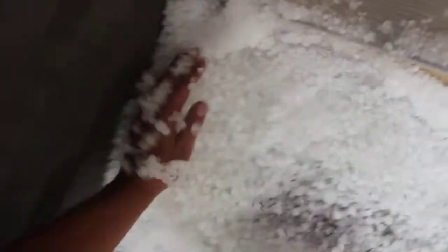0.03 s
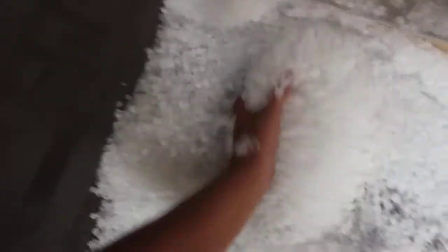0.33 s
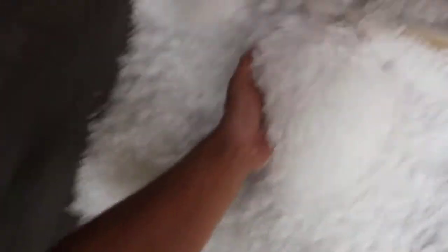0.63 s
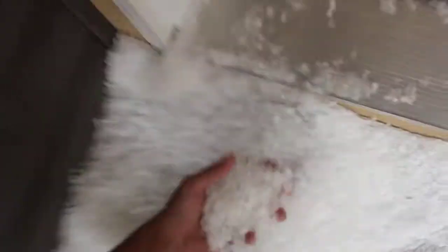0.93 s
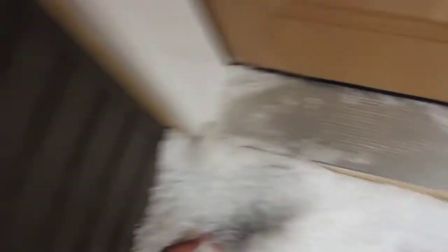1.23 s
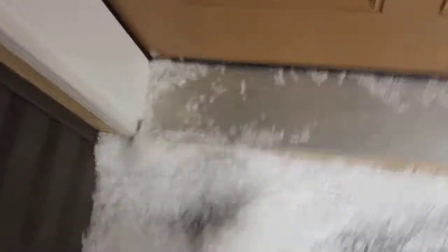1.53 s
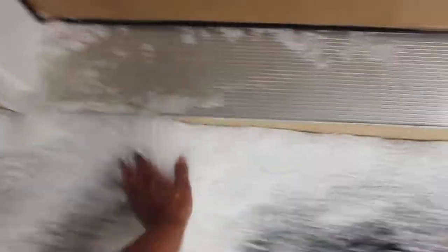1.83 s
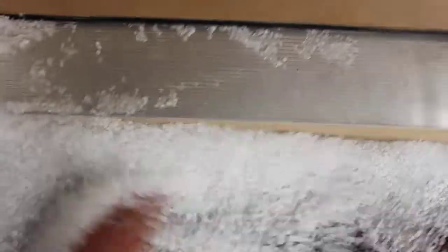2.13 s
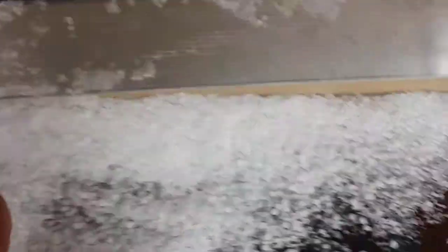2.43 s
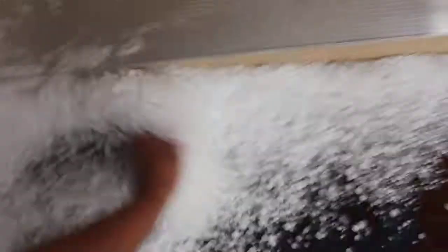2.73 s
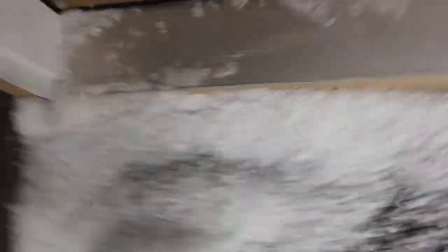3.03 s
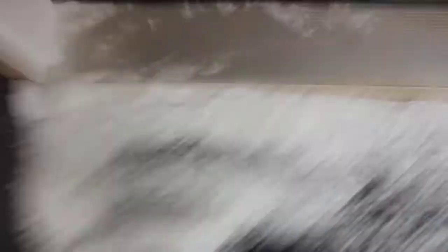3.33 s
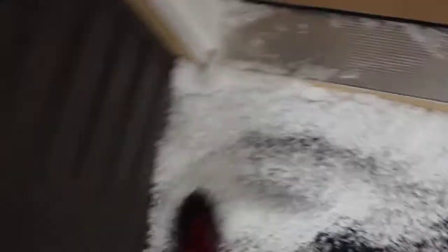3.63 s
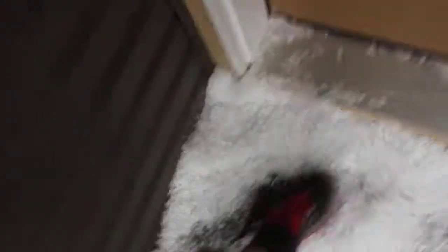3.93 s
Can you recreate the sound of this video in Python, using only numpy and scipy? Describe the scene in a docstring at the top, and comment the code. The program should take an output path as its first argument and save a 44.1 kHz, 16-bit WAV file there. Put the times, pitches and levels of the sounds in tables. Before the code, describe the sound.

A hand rakes through loose hailstones outdoors, making dense, bright ticking and deeper crunches. The raking eases, resumes in several scoops, pauses, then returns once more. Low wind buffeting and handling knocks hit the nearby microphone almost throughout.

```python
"""Hand raking hailstones on a doorstep

Countless ice pellets tick together close to a phone; each scoop shoves a mass of them
with a deeper crunch, and some rattle on the metal sill.
Gusts and handling buffet the microphone with low, ragged bumps."""
import sys
import numpy as np
from scipy import signal
from scipy.fft import rfft, irfft
from scipy.io import wavfile
from scipy.ndimage import uniform_filter1d

SR = 44100
rng = np.random.default_rng(int(sys.argv[2]) if len(sys.argv) > 2 else 0)


def to_wav(sig):
    """Store sig (one row per channel, or 1-D mono) as 16-bit WAV at the path in sys.argv[1].

    Samples outside -1..1 are clipped; the rate is SR.
    """
    pcm = np.clip(np.atleast_2d(sig), -1, 1) * 32767
    pcm = np.round(pcm).astype(np.int16)
    wavfile.write(sys.argv[1], SR, pcm.T)  # frames by channels


N = 176400
CRUNCHES_PER_S, CRUNCH_SPREAD_DB = 7000, 0.5


def undb(db):
    """Decibels to gain."""
    return 10 ** (np.asarray(db) / 20)


def unit(x):
    """Scale to rms 1."""
    return x / np.sqrt(np.mean(x ** 2))


def clock():
    """Sample times [s]."""
    return np.arange(N) / SR


def cut(x, hz, kind, order=2):
    """Butterworth low-pass or high-pass."""
    return signal.sosfilt(signal.butter(order, hz, kind, fs=SR, output="sos"), x)


def colour(x, points):
    """Filter by (frequency [Hz], gain [dB]) points."""
    hz, db = np.array(points).T
    bins_hz = np.maximum(np.arange(N // 2 + 1) * SR / N, 1)
    gain = undb(np.interp(np.log(bins_hz), np.log(hz), db))
    return irfft(rfft(x) * gain, N)


def flutter(rms_db, rate_hz):
    """Smooth random gain."""
    hold = int(SR / rate_hz)
    steps = np.repeat(rng.standard_normal(N)[:N // hold + 1], hold)
    return undb(rms_db * unit(uniform_filter1d(steps, hold)[:N]))


def impacts(per_s, spread_db):
    """Random impulses: many small, a few large."""
    hits = rng.random(N) < per_s / SR
    polarity = np.sign(rng.standard_normal(N))
    size = np.minimum(rng.exponential(size=N), 3.6)
    return hits * polarity * undb(spread_db * size)


def swell(peak_s, rise_s, fall_s):
    """Asymmetric bell envelope."""
    t = clock() - peak_s
    return np.exp(-(t / np.where(t < 0, rise_s, fall_s)) ** 2 / 2)


def loose_pellets():
    """Ice slides over ice in dense, bright ticks."""
    # slide envelope (time [s], level [dB])
    slide = [(0, -30), (0.025, -28.5), (0.09, -35.5), (0.2, -32.5), (0.3, -33.5), (0.35, -35),
             (0.54, -40.5), (0.61, -35), (0.68, -49.5), (0.76, -45.5), (0.86, -42), (1.0, -45),
             (1.15, -50.5), (1.22, -51.5), (1.33, -59), (1.405, -55), (1.425, -36.5), (1.45, -37),
             (1.51, -39.5), (1.69, -32.5), (1.8, -36), (1.93, -37.5), (2.05, -33), (2.19, -28.5),
             (2.26, -32.5), (2.3, -36), (2.38, -48.5), (2.55, -35), (2.74, -33.5), (2.79, -40),
             (2.935, -36.5), (2.99, -48), (3.13, -55.5), (3.25, -70), (3.34, -60.5), (3.41, -42.5),
             (3.46, -63), (3.535, -72), (3.555, -38.5), (3.7, -40.5), (3.94, -42), (4.0, -50)]
    # tick spectrum (frequency [Hz], gain [dB])
    spectrum = [(500, -9.5), (1200, -6), (2000, -9), (3000, -5.5), (5000, -2.5), (7700, -2), (12300, -0.5),
                (15500, -4.5)]
    ticks = cut(colour(impacts(per_s=11000, spread_db=1), spectrum), 290, "high")
    time_s, level_db = np.array(slide).T
    envelope = undb(np.interp(clock(), time_s, level_db) + 2)
    return unit(ticks) * envelope * flutter(rms_db=0.96, rate_hz=90)


def gust(start_s, end_s, attack_s=0.0045, release_s=0.0058, tail_db=-10, tail_s=0.076):
    """Gust envelope: quick attack, hold, quick release, weak tail."""
    t = clock()
    attack = (1 + np.tanh((t - start_s) / attack_s)) / 2
    release = (1 - np.tanh((t - end_s) / release_s)) / 2
    tail = undb(tail_db) * np.exp(-np.maximum(t - end_s, 0) / tail_s)
    return attack * np.maximum(release, tail)


def wind():
    """Ragged gusts over a low breeze: large eddies thud, small ones rasp."""
    # gusts on the microphone (start [s], end [s], rumble level [dB], rasp level [dB])
    gusts = [(0, 0.089, -26.5, -32.5), (0.1, 0.177, -22.5, -40.5), (0.214, 0.585, -45.5, -48),
             (0.41, 0.463, -37.5, -52), (0.567, 0.623, -22.5, -39), (0.618, 0.68, -20.5, -31),
             (0.69, 0.732, -27, -31), (0.721, 0.8, -29, -44.5), (0.817, 0.844, -29, -45),
             (0.882, 0.916, -30.5, -41), (0.962, 1.035, -31.5, -40.5), (1.076, 1.146, -29.5, -39),
             (1.205, 1.258, -25, -41), (1.237, 1.289, -23.5, -33), (1.26, 1.333, -26.5, -44),
             (1.343, 1.431, -23, -39), (1.442, 1.496, -33.5, -44), (1.516, 1.545, -22, -32),
             (1.566, 1.642, -24, -33), (1.677, 1.751, -25.5, -32), (1.78, 1.872, -33.5, -41.5),
             (2.037, 2.086, -29, -44), (2.173, 2.247, -30, -43), (2.248, 2.323, -21.5, -28.5),
             (2.334, 2.415, -28, -32.5), (2.438, 2.493, -26.5, -26), (2.486, 2.565, -31.5, -31.5),
             (2.538, 2.6, -24, -26.5), (2.59, 2.731, -31.5, -46), (2.785, 2.896, -26.5, -43.5),
             (2.924, 2.978, -25, -35), (2.972, 3.134, -27, -39.5), (3.139, 3.19, -20, -33),
             (3.184, 3.349, -24, -33.5), (3.377, 3.414, -33.5, -46), (3.532, 3.617, -36.5, -57),
             (3.835, 3.885, -45, -75), (3.972, 3.994, -37, -67)]
    # large-eddy spectrum (frequency [Hz], gain [dB])
    rumble_spectrum = [(13, -40), (22, -17.5), (108, 0.5), (172, 1), (354, -5.5), (700, -21.5), (910, -44),
                       (1540, -120)]
    # small-eddy spectrum (frequency [Hz], gain [dB])
    rasp_spectrum = [(250, -43), (480, 4.5), (800, -3.5), (1300, -11.5), (2200, -22.5), (4000, -31.5),
                     (8000, -46)]
    rumble_gain, rasp_gain = 0, 0
    for start_s, end_s, rumble_db, rasp_db in gusts:
        envelope = gust(start_s, end_s)
        rumble_gain = np.maximum(rumble_gain, undb(rumble_db) * envelope)
        rasp_gain = np.maximum(rasp_gain, undb(rasp_db) * envelope ** 2)
    rumble = cut(colour(impacts(per_s=900, spread_db=3), rumble_spectrum), 513, "low", order=4)
    rasp = cut(colour(impacts(per_s=700, spread_db=4), rasp_spectrum), 164, "high")
    bursts = undb(2) * unit(rumble) * rumble_gain + undb(1) * unit(rasp) * rasp_gain
    breeze = undb(-52.5) * unit(cut(rumble, 216, "low")) * flutter(rms_db=1.5, rate_hz=25)
    return bursts * flutter(rms_db=2, rate_hz=110.1) + breeze


def air():
    """Faint, steady outdoor noise."""
    # (frequency [Hz], gain [dB])
    spectrum = [(30, -16), (150, 8), (500, -4.5), (1600, -1.5), (4000, -16.5), (15000, -37)]
    return undb(-55.5) * unit(colour(rng.standard_normal(N), spectrum))


def buffets(rise_cycles=0.31, fall_cycles=0.41, crack_s=0.0028):
    """Pointed pressure swings of a cycle or two, each with a dull crack."""
    # bumps on the microphone (time [s], thud level [dB], pitch [Hz], crack level [dB])
    bumps = [(0.001, -2.5, 284, -26.5), (0.168, -9.5, 236, -49), (0.58, -6.5, 269, -34),
             (0.622, -1.5, 324, -40), (0.642, -2, 324, -24.5), (0.654, -9, 380, -26),
             (0.66, -3.5, 412, -49), (0.695, -17, 350, -29), (0.712, -3.5, 178, -29), (0.718, -4, 417, -25),
             (0.756, -12, 368, -34.5), (0.77, -15, 303, -48), (0.98, -15, 348, -39.5),
             (1.009, -14.5, 320, -38), (1.104, -9.5, 264, -43), (1.243, -4.5, 343, -42),
             (1.252, -6.5, 520, -27.5), (1.417, -7, 217, -57), (1.544, -12, 313, -31),
             (1.573, -15, 445, -39), (1.6, -5.5, 377, -54), (1.676, -14, 384, -30), (1.723, -6.5, 360, -32),
             (1.746, -6, 308, -31), (1.821, -15, 364, -33.5), (2.257, -8, 400, -38), (2.318, -7, 296, -33),
             (2.349, -4.5, 386, -28), (2.401, -8, 238, -52), (2.432, -6.5, 340, -27),
             (2.561, -5.5, 295, -41), (2.567, -8.5, 407, -24), (2.827, -11, 500, -25),
             (2.914, -4.5, 245, -28), (2.951, -5, 340, -32), (2.953, 1, 317, -29.0),
             (3.029, -13, 315, -30.5), (3.099, -16.5, 219, -55), (3.162, -4, 266, -26),
             (3.277, -15, 384, -31), (3.315, -13, 251, -50), (3.327, -8.5, 330, -40),
             (3.392, -3, 240, -26.5), (3.552, -15.5, 473, -35.5)]
    thuds, crack_gain = 0, 0
    for (time_s, thud_db, hz, crack_db), phase in zip(bumps, rng.random(len(bumps))):
        t = clock() - time_s
        thud_tau_s = np.where(t < 0, rise_cycles, fall_cycles) / hz
        thud_envelope = np.exp(-np.minimum(np.abs(t) / thud_tau_s, 20))
        thuds += undb(thud_db) * thud_envelope * np.cos(2 * np.pi * (hz * t + phase))
        crack_tau_s = np.where(t < 0, crack_s / 2, crack_s)
        crack_gain += undb(crack_db) * np.exp(-np.minimum(np.abs(t) / crack_tau_s, 20))
    grit = cut(cut(rng.standard_normal(N), 590, "high"), 1434, "low", order=3)
    return undb(1) * cut(thuds, 2300, "low") + undb(4) * crack_gain * unit(grit)


def scoops():
    """Each shove moves a mass of pellets; the deeper it digs, the lower the crunch reaches."""
    # shoves (peak [s], rise [s], fall [s], level [dB], low edge [Hz], high edge [Hz])
    shoves = [ (.016, .05, 0.032, -27.5, 970, 6200), (.295, 0.058, 0.045, -30.5, 2260, 6200),
              (.32, 0.21, 0.17, -37.5, 567, 3400), (1.15, 0.18, 0.27, -51.5, 670, 3200),
              (1.448, 0.0087, 0.056, -37, 1110, 5270), (1.69, 0.067, 0.042, -33, 2600, 8050),
              (2.171, 0.065, 0.035, -31, 1710, 8240), (2.292, 0.01, 0.029, -29, 1220, 6060),
              (2.58, 0.088, .06, -41, 1340, 5030), (2.691, 0.078, 0.057, -32.5, 1390, 5270),
              (3.555, 0.0017, 0.17, -40.5, 1100, 11000), (3.694, 0.065, 0.063, -32, 1330, 4430), ]
    out = 0
    for peak_s, rise_s, fall_s, db, low_hz, high_hz in shoves:
        hits = impacts(CRUNCHES_PER_S, CRUNCH_SPREAD_DB)
        crunch = cut(cut(hits, low_hz, "high", order=4), high_hz, "low")
        out += unit(crunch) * undb(db) * swell(peak_s, rise_s, fall_s)
    return out * flutter(rms_db=1.5, rate_hz=70)


def spill(decay_s=0.0015):
    """Stray pellets trickle off the lifted handful, one tiny snap each."""
    snap = rng.standard_normal(300) * np.exp(-clock()[:300] / decay_s)
    drops = impacts(per_s=450, spread_db=7.5)
    ticks = cut(signal.fftconvolve(drops, snap)[:N], 2000, "high")
    return undb(-50) * unit(ticks) * swell(peak_s=1.76, rise_s=2.5, fall_s=0.1)


def sill(t60_s=0.12):
    """Thrown pellets ring the metal sill."""
    # sill modes (frequency [Hz], level [dB])
    modes = [(2333, -6), (2561, -10), (2731, 2), (2785, 2), (2848, -8), (2918, -7), (3063, 3), (3365, -15),
             (4634, -6)]
    # pellet showers (peak [s], rise [s], fall [s], level [dB])
    showers = [(.29, 0.018, 0.03, -30), (.3, 0.22, 0.2, -53)]
    t = clock()[:SR // 2]
    ring = sum(undb(db) * np.sin(2 * np.pi * hz * t) for hz, db in modes)
    ring *= np.exp(-np.log(1000) * t / t60_s)
    envelope = sum(undb(db) * swell(*timing_s) for *timing_s, db in showers)
    hits = unit(impacts(per_s=1200, spread_db=2.5)) * envelope
    return signal.fftconvolve(hits, ring / np.linalg.norm(ring))[:N]


def clicks(decay_s=0.0013):
    """Single pellets snap close to the microphone."""
    # snaps (time [s], level [dB])
    snaps = [(0.895, -28), (.980, -29), (1.094, -26), (1.128, -25.5), (1.142, -27), (1.295, -36),
             (1.368, -26), (1.392, -35), (1.82, -15), (3.163, -26.5), (3.205, -26), (3.225, -35)]
    t = clock()
    envelope = sum(undb(db) * (t >= at_s) * np.exp(-np.abs(t - at_s) / decay_s) for at_s, db in snaps)
    noise = cut(rng.standard_normal(N), 1600, "high", order=1)
    return undb(-5.5) * envelope * unit(noise)


def hollows(bandwidth_hz=590, octaves_per_s=2.6):
    """The crunch rings the hollow under the cupped hand; pitch climbs as pellets fill it."""
    # hollow resonances (peak [s], rise [s], fall [s], level [dB], pitch at peak [Hz])
    resonances = [(2.67, 0.054, 0.033, -41.5, 2530), (3.685, 0.062, 0.073, -36, 1120)]
    out = 0
    for peak_s, rise_s, fall_s, db, hz in resonances:
        pitch_hz = hz * 2 ** np.clip(octaves_per_s * (clock() - peak_s), -1, 1)
        carrier = np.exp(2j * np.pi * np.cumsum(pitch_hz) / SR)
        hits = impacts(CRUNCHES_PER_S, CRUNCH_SPREAD_DB)
        ring = np.real(carrier * cut(hits / carrier, bandwidth_hz / 2, "low"))  # gliding band-pass
        out += unit(ring) * undb(db) * swell(peak_s, rise_s, fall_s)
    return out


def scene():
    """Ice, air and wind, the same in both channels."""
    ice = loose_pellets() + scoops() + hollows() + sill() + clicks() + spill()
    return np.tile(ice + air() + wind() + buffets(), (2, 1))


def record(dry):
    """The phone cuts the deepest bass and the top."""
    low_hz, top_hz = 36, 15750
    steep_lowpass = signal.ellip(10, 0.2, 80, top_hz, fs=SR, output="sos")
    return signal.sosfilt(steep_lowpass, cut(dry, low_hz, "high"))


dry = scene()
out = record(dry)
to_wav(out)
```